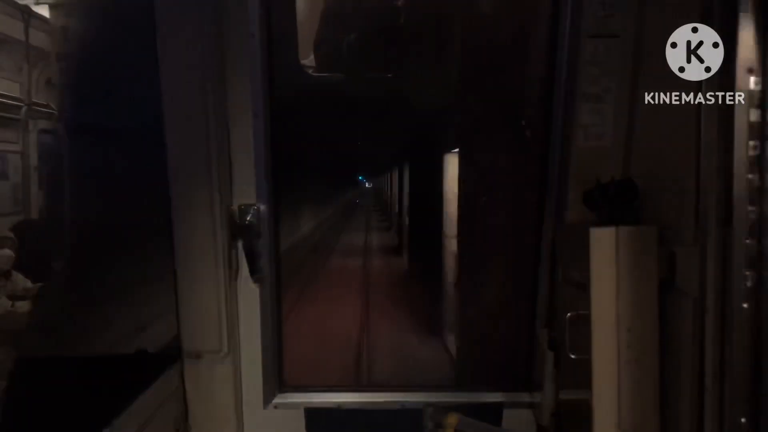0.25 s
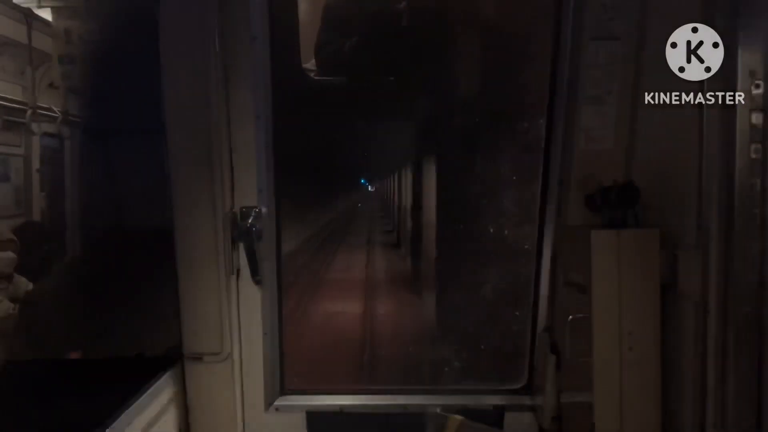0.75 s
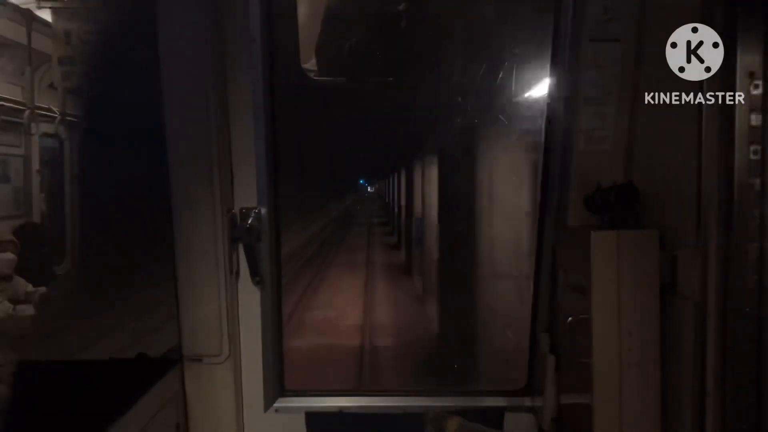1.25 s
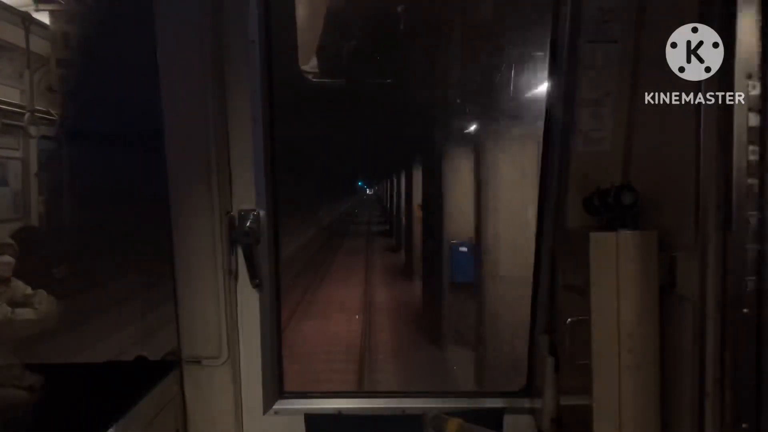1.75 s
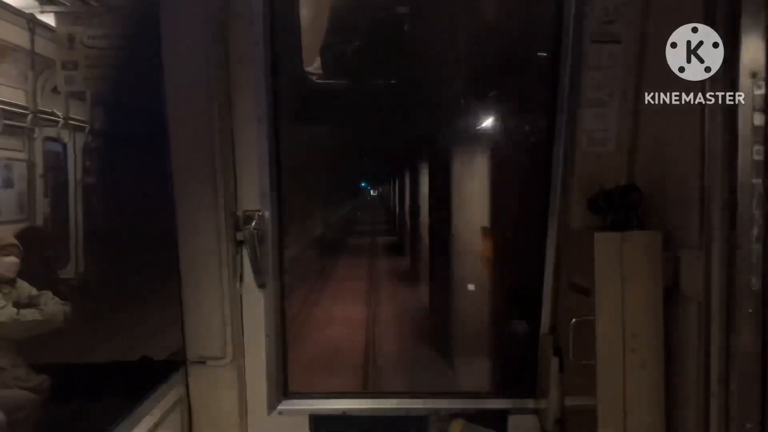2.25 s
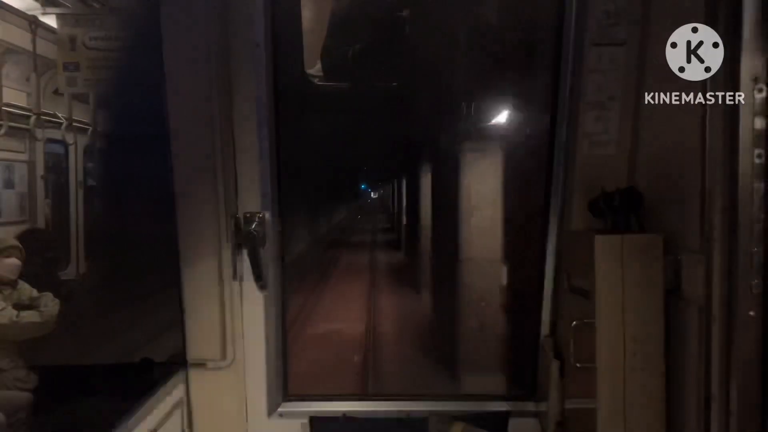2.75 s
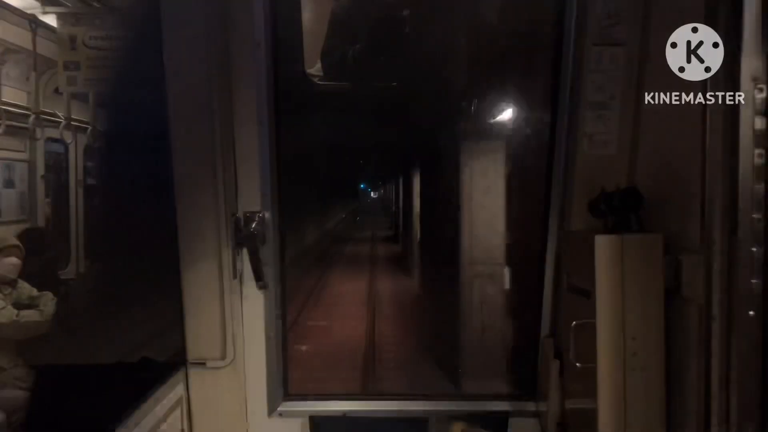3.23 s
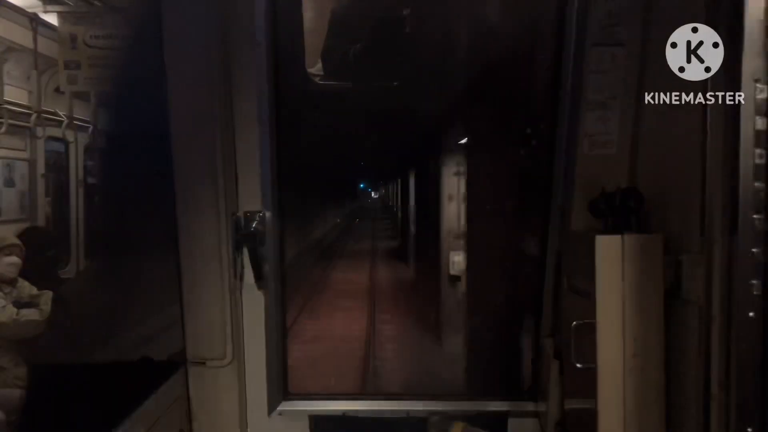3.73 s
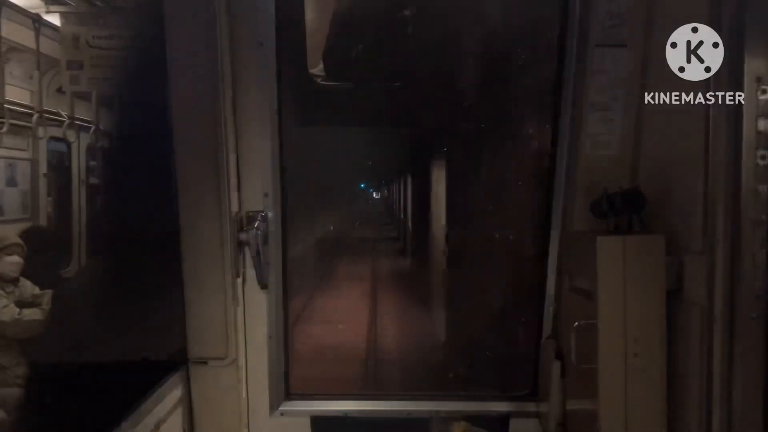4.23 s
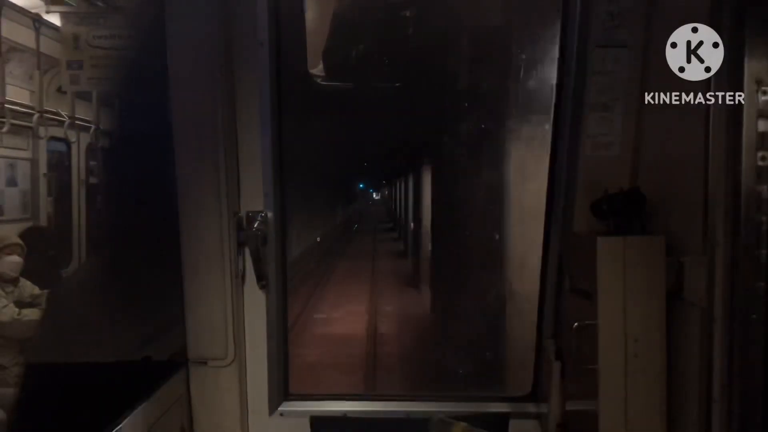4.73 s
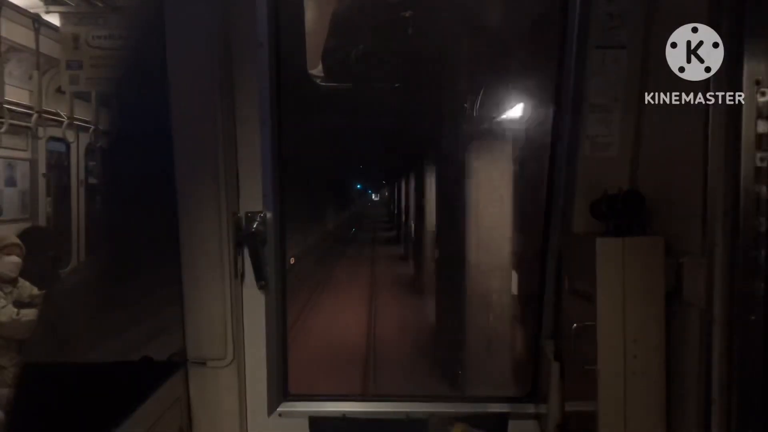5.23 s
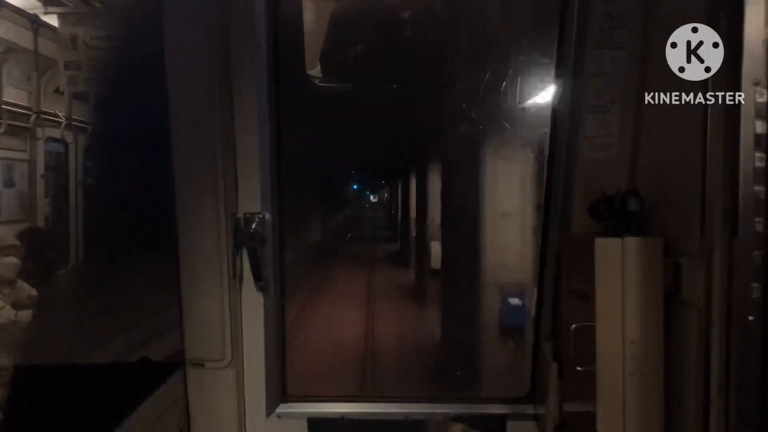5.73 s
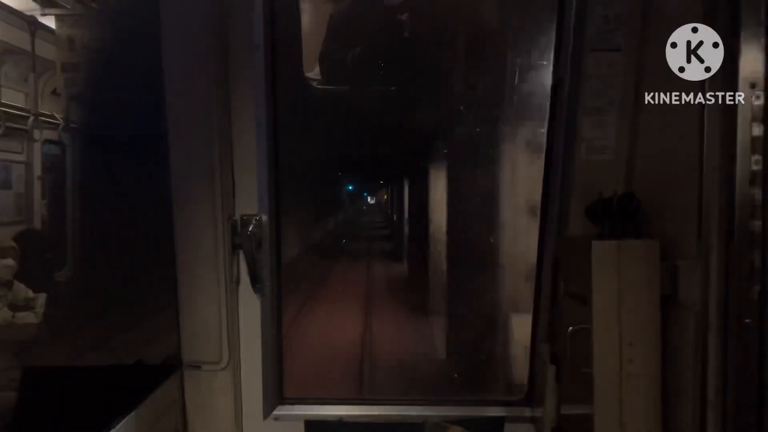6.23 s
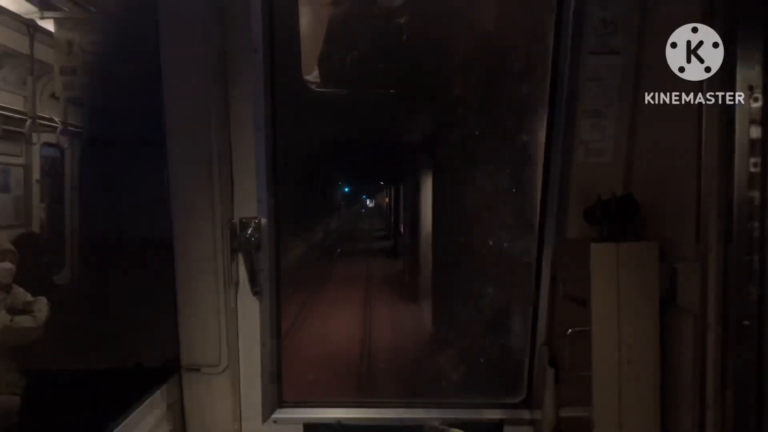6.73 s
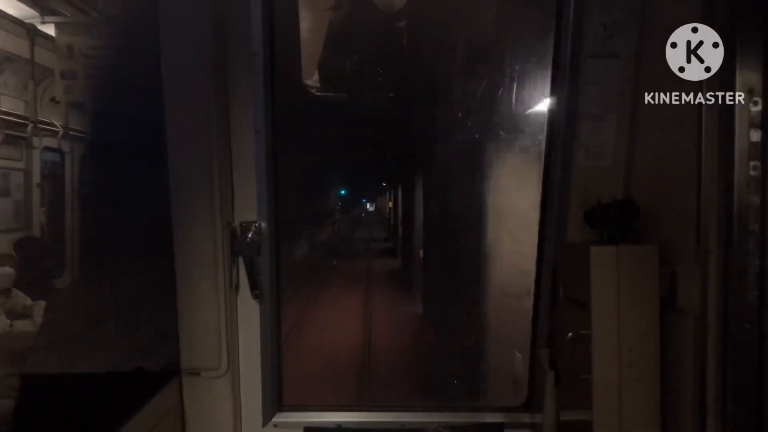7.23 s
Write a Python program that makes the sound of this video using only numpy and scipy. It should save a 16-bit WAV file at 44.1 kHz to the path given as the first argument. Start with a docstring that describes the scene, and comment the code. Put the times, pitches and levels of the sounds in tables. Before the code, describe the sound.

Continuous bass-heavy train rolling fills a small metal cab underground. Rapid, uneven thuds from a wheel ride over it, fainter around two to three seconds and firmer again later. Fittings tick and rattle, and uneven track adds soft low bumps. A faint rail tone lies underneath. After six seconds comes a quick sharp air puff with clinking metal, then tiny squeaks, while the train keeps running. Close stereo pickup, muffled on top.

```python
"""Inside the cab of an underground train running through a tunnel.
Wheels roar on the rails and boom in the car body: bands of noise and narrow hums with moving levels.
A flat spot on a wheel knocks, as short dying tones; loose fittings rattle in bursts of noise around the knocks.
Uneven track gives dull swelling tones, the rail sings a gliding tone, and a few faint squeaks are heard.
A valve lets off one burst of noisy air, and its metal parts clack and ring."""
import sys
import numpy as np
from scipy import signal
from scipy.fft import rfft, irfft
from scipy.io import wavfile
from scipy.ndimage import uniform_filter1d

SR = 44100
rng = np.random.default_rng(int(sys.argv[2]) if len(sys.argv) > 2 else 0)


def transcribe(signal):
    """Save signal, clipped to [-1, 1], as a 16-bit WAV file at the path in sys.argv[1]."""
    frames = np.atleast_2d(signal).T
    limited = np.clip(frames, -1, 1)
    pcm = np.round(limited * 32767).astype(np.int16)
    wavfile.write(sys.argv[1], SR, pcm)


N = 329868

# Slow levels of the rolling. Each row: time in seconds, floor rumble in dB, rail roar in dB, hiss in dB.
ROLLING_LEVELS = [(0, -13.5, -28, -37.5), (.15, -19.5, -30, -44.5), (.42, -19, -28.5, -45.5),
                  (.85, -17.5, -27, -39.5), (1.12, -21.5, -33.5, -47), (1.4, -20, -32.5, -49.5),
                  (1.8, -25, -34.5, -47.5), (2.1, -22.5, -28, -50.5), (2.5, -25, -32.5, -48),
                  (2.9, -21.5, -32, -47.5), (3.5, -24, -30.5, -47), (3.9, -21, -33, -48),
                  (4.3, -23.5, -30, -47), (4.55, -18, -29.5, -46), (4.85, -23, -33, -48.5),
                  (5.0, -19, -31.5, -44), (5.15, -23.5, -30.5, -48), (5.7, -22, -29.5, -44.5),
                  (6.0, -21, -32.5, -49), (6.39, -22.5, -29, -47), (6.9, -22.5, -33.5, -50),
                  (7.48, -25.5, -30.5, -46.5)]
# Boom of the car body. Each row: time in seconds, level in dB.
BOOM_LEVELS = [(0, -16.5), (.45, -20.5), (.7, -16.5), (1.0, -19), (1.35, -18), (1.7, -17.5), (2.3, -19),
               (2.7, -22), (3.4, -21), (4.2, -21.5), (5.1, -22), (5.7, -21), (6.05, -21), (6.4, -19),
               (6.9, -19.5), (7.2, -21), (7.48, -9.5)]
# Rush of air and wheel noise off the tunnel wall. Each row: time in seconds, level in dB.
RUSH_LEVELS = [(0.0, -42.5), (0.43, -46.5), (0.7, -43), (0.83, -43.5), (1.18, -48.5), (1.32, -50.5),
               (1.86, -50.5), (2.18, -48.5), (3.54, -47.5), (3.92, -49.5), (4.52, -47), (4.83, -44),
               (5.26, -48), (5.59, -46), (6.07, -46.5), (6.53, -44), (6.8, -48), (7.44, -46.5)]
# Pitches in Hz where boom, rumble, roar, rush and hiss are centred, one number each.
ROLLING_CENTRES_HZ = [62, 170, 700, 1800, 3600]
# Colour of the roar around those five levels. Each row: pitch in Hz, level in dB.
ROAR_COLOUR = [(25, -30), (40, -12), (62, -5), (90, -5.5), (170, -9), (300, -8), (500, -13.5), (750, -9.5),
               (1200, -11.5), (1600, -8.5), (2200, -3.5), (2600, -8), (3200, -9), (5000, -16.5),
               (7500, -14), (12000, -22), (15000, -34.5)]
# Narrow resonances kept sounding by the rolling.
# Each row: pitch in Hz, width in Hz, level in dB against the slow level at that pitch.
ROLLING_HUMS = [(65.17, 14.2, -4), (108, 20, -8.5), (167.6, 23, -13), (209.1, 30, -12), (472.3, 49, -18),
                (738, 160, -18.5), (2175, 190, -10.5), (2825, 120, -18), (3033, 200, -13)]
# Wheel flat striking the rail. Each row: time in seconds, strength in dB,
# floor thump in dB against that strength, upper wheel tones in dB against that strength.
KNOCKS = [(0.043, -11, 2.5, -18), (0.29, -12.5, 3.5, -15.5), (0.516, -14, 0, -13.5),
          (0.669, -24.5, 2.5, -11), (0.758, -10, 1, -17.5), (1.012, -13, 3, -11), (1.235, -14, 6, -11),
          (1.32, -21, -2.5, -9.5), (1.665, -26.5, 6.5, -16), (2.014, -27, 2, -7), (2.132, -14, -3, -10),
          (2.226, -21.5, 1, -10.5), (2.364, -23.5, -5, -4.5), (2.588, -22.5, 3, -9), (2.814, -19.5, 3, -9),
          (3.035, -17.5, 1.5, -9.5), (3.139, -18.5, -1.5, -11.5), (3.264, -28, 12, -15),
          (3.484, -14.5, 3, -10), (3.712, -22, 0, -7.5), (3.948, -11, 3, -12), (4.169, -16, 4, -8),
          (4.407, -19, 5.5, -5.5), (4.486, -24, 6.5, -6), (4.598, -12, 4, -11.5), (4.818, -12, -1, -15),
          (5.046, -15, 2.5, -14.5), (5.27, -14, 5.5, -11.5), (5.467, -19, 3.5, -8.5),
          (5.693, -15, 3.5, -8.5), (5.895, -13.5, 1.5, -13.5), (6.125, -10, 2.5, -15),
          (6.338, -10, 3.5, -12), (6.544, -14, 4, -12), (6.629, -14, -2, -12), (6.751, -15.5, 0, -11),
          (6.953, -14.5, 0.5, -10), (7.037, -20, 5, -11), (7.176, -18.5, 6.5, -11.5),
          (7.371, -18.5, -5, -8)]
# Ringing tones of wheel and bogie. Each row: pitch in Hz, level in dB, time to fade by 60 dB in seconds.
BOGIE_TONES = [(243.9, -4.5, 0.14), (302.3, -11, 0.25), (390.8, -9.5, 0.16), (470.1, -11.5, 0.22),
               (562, -17, 0.12), (636.5, -13.5, 0.076), (711, -9.5, 0.081), (766, -11, 0.096),
               (875, -11, 0.023), (954.4, -6, 0.067), (1030, -5.5, 0.041), (1140, -4, 0.067),
               (1202, -12, 0.033), (1590, -15, 0.035), (2206, -11, 0.043)]
# Ringing tones of the floor, reached through the springs.
# Each row: pitch in Hz, level in dB, time to fade by 60 dB in seconds.
FLOOR_TONES = [(106.7, -0.5, 0.26), (140, -6.5, 0.071), (167.3, -8, 0.2)]
# Loose fittings shaken into a rattle. Each row: start in seconds, strength in dB.
SHAKES = [(0.0153, -33.5), (0.2674, -33.5), (0.498, -31.5), (0.524, -36), (0.7475, -32), (.8, -42.5),
          (0.987, -34.5), (1.229, -41), (1.298, -43), (1.886, -45), (2.0223, -42), (2.1326, -37.5),
          (2.2526, -46.5), (2.359, -46.5), (3.038, -45.5), (3.133, -47), (3.4875, -39), (3.943, -37.5),
          (4.1593, -40), (4.401, -39), (4.594, -36), (4.817, -38), (5.0476, -47.5), (5.271, -39),
          (5.467, -43.5), (5.688, -45), (5.879, -38), (6.042, -43), (6.123, -38), (6.341, -39),
          (6.382, -35.5), (6.545, -42), (6.6288, -41), (6.679, -42), (6.7442, -47), (6.8488, -47),
          (6.95, -40.5), (6.9992, -40.5), (7.1676, -43.5), (7.3344, -38.5)]
# Single bright ticks of a loose fitting. Each row: start in seconds, strength in dB.
TICKS = [(.109, -33), (.589, -32), (1.096, -50), (1.135, -37), (2.161, -33), (2.255, -38), (3.365, -50),
         (4.13, -38), (4.525, -40), (4.787, -40), (5.554, -45), (5.816, -40), (5.893, -46), (6.138, -42),
         (6.244, -38), (7.362, -42), (7.373, -34)]
# Colour of rattles and ticks. Each row: pitch in Hz, level in dB.
RATTLE_COLOUR = [(1000, -13), (2000, -19), (3200, -14.5), (4800, -19), (7500, -18), (12000, -20.5),
                 (15000, -33)]
# Dull jolts from uneven track. Each row: time of the peak in seconds, pitch in Hz, peak in dB.
JOLTS = [(.085, 62.2, -5), (0.561, 106.4, -13.5), (.775, 171, -14), (0.817, 63.6, -4.5), (.915, 59.3, -7),
         (1.529, 62.2, -11.5), (1.89, 153.6, -12), (2.018, 105, -13), (2.02, 216, -13), (2.059, 207, -16),
         (2.15, 173, -19), (2.169, 222, -12), (2.18, 69, -12), (2.26, 176, -17.5), (2.36, 61.4, -15.5),
         (2.64, 81, -23.5), (2.778, 190.5, -12.5), (2.81, 148, -18), (2.864, 67.8, -14.5),
         (2.9, 164, -13.5), (2.919, 223, -13), (3.153, 151.4, -19.5), (3.16, 208, -16), (3.165, 82, -15.5),
         (3.275, 138.5, -19), (3.278, 210, -10), (3.342, 70, -19.5), (3.535, 110.5, -12),
         (3.828, 214, -13.5), (3.993, 176, -13.5), (4.162, 71, -13), (4.2, 174.4, -11.5),
         (4.44, 170.5, -16), (4.454, 100, -12), (4.608, 215, -14), (4.68, 191, -14.5), (4.7, 60, -15.5),
         (4.835, 170.3, -15), (4.985, 109, -15), (5.697, 76.3, -13), (6.371, 64.7, -10.5),
         (7.221, 62.4, -16.5)]
# The singing rail. Each row: time in seconds, pitch in Hz, level in dB.
RAIL_GLIDE = [(0, 727, -63), (1.3, 726, -42.5), (1.7, 703, -49.5), (2.3, 699, -45.5), (2.8, 696, -47),
              (3.3, 694.4, -40), (3.9, 679, -43), (4.5, 714.5, -39), (5.0, 712, -45), (5.5, 706, -46.5),
              (6.2, 724, -45.5), (7.48, 717, -68)]
# Colour of the air jet. Each row: pitch in Hz, level in dB.
JET_COLOUR = [(900, -37), (1400, -27), (2000, -18), (2500, -16), (3000, -10), (5000, -11.5), (7500, -8),
              (12000, -12), (15000, -22)]
# Metal parts that ring when the air bursts out.
# Each row: pitch in Hz, width in Hz, level in dB, time in seconds of a 60 dB fade on top of the jet's own.
WHISTLES = [(1855, 89, -12, 0.3), (3040, 77, -9, 0.3), (3680, 70, -9, 1.5), (4550, 69, -18, .4),
            (5100, 150, -8.5, 0.31), (6170, 77, -13, .4), (7460, 260, -9, 1.5)]
# Valve parts struck as it opens and shuts. Each row: start in seconds, strength in dB.
VALVE_CLACKS = [(6.383, -43), (6.393, -48), (6.4116, -33), (6.418, -37), (6.424, -38), (6.433, -41),
                (6.444, -39), (6.456, -41), (6.475, -42), (6.49, -44), (6.506, -47)]
# What those parts ring with. Each row: pitch in Hz, level in dB, time to fade by 60 dB in seconds.
VALVE_TONES = [(1875, -11, 0.089), (2250, -11, 0.088), (2970, -3.5, 0.067), (3720, -9, .15),
               (4226, -10, 0.084), (4680, -6, .08), (4950, -4, 0.056), (5340, -10, 0.071), (5750, -8, .08),
               (6169, -8, .1), (6735, -10, .1), (7350, -6.5, 0.11)]
# Faint high squeaks. Each row: start in seconds, level in dB, length in seconds.
SQUEAKS = [(6.673, -56, 0.055), (6.847, -56, 0.026), (7.002, -54, 0.037)]
# Stereo width of the cab. Each row: pitch in Hz, side minus mid in dB.
WIDTH = [(60, -25), (130, -17), (290, -5.5), (630, -3.5), (1390, 3), (2200, 0.5), (3040, -1), (4500, 0),
         (6680, -9.5), (9000, -27), (14600, -19)]
# Stereo balance of the cab. Each row: pitch in Hz, left minus right in dB.
TILT = [(60, -1.5), (180, -0.5), (540, 0.5), (1620, 1), (4880, 1.0), (14600, -1.5)]
# Colour of the microphone in its housing. Each row: pitch in Hz, level in dB.
MICROPHONE_COLOUR = [(20, -19), (40, -0.5), (2800, 0.5), (3150, 0), (3500, -3.5), (5000, 2), (5800, -3.5),
                     (7300, -2.5), (8100, -8), (9300, -8.5), (11500, -3), (13400, -6.5), (14400, -6.5),
                     (15400, -2), (16500, -12.5)]

TREBLE_CALM, CALM_ABOVE_HZ = .6, 1400   # the treble of the roar is less patchy
STEADY_BELOW_HZ, STEADINESS, STEADY_S = 130, 0.92, 0.072   # low noise is evened out over STEADY_S
# A negative lag starts the sound before the time in the knock table.
BOGIE_LAG_S, FLOOR_LAG_S = -0.001987, .026
CONTACT_S = .006   # basic spacing of the bounces, before each tone's random delay
BLOW_RISE_S = .0012   # a wheel does not strike quite at once
KNOCK_PAN_DB = -0.5   # left-right scatter
RATTLE_T60_S, RATTLE_REFERENCE_DB = 0.35, -38.5   # a shake of this strength takes this long to fade by 60 dB
RATTLE_LONGER_S_PER_DB = -0.04   # negative: faint shakes linger longer
RATTLE_HOLD_S, SHAKE_RISE_S = 0.017, 0.0015
TICK_T60_S, FIRST_TICK_DB = 0.049, -2.5   # each shake also opens with a tick, set against its strength
JOLT_RISE_CYCLES = 2.097
RAIL_STEADY = 0.8   # steady part of the tone against its wandering part
AIR_START_S, AIR_ATTACK_S, AIR_HOLD_S = 6.409, 0.006, 0.0091   # the hold is counted from the start
AIR_DB, AIR_FADE_DB_PER_S = -28, 180
SQUEAK_HZ, SQUEAK_WIDTH_HZ = 7900, 240
PORT_LAG_S, PORT_LAG_FROM_HZ = .000241, 3100   # treble from one side reaches the left port late
PEAK, CUTOFF_HZ = .95, 16200


def from_db(db):
    """Gain of a level in dB."""
    return 10 ** (np.asarray(db) / 20)


def rms_one(x):
    """Scales to an rms (average strength) of 1."""
    return x / np.sqrt(np.mean(x ** 2) + 1e-20)


def in_time(rows):
    """Turns the columns of a table into curves over all samples."""
    s, *columns = np.transpose(rows)
    return np.array([np.interp(np.arange(N) / SR, s, c) for c in columns])


def at_hz(points, hz):
    """Reads a colour table at a pitch, on a log-frequency axis."""
    table = np.array(points)
    return np.interp(np.log(hz), np.log(table[:, 0]), table[:, 1])


def drift(rate_hz):
    """Slow chance: noise at every 40th sample, smoothed twice by a one-pole low-pass; spread 1."""
    r = np.exp(-80 * np.pi * rate_hz / SR)
    noise = rng.standard_normal(N // 40 + 2002)
    slow = signal.lfilter([1], [1, -2 * r, r * r], noise)[2000:]   # drop the filter's start
    return np.interp(np.arange(N) / 40, np.arange(len(slow)), rms_one(slow))


def stereo(mid, side, hz):
    """Left and right from a mid and a side signal, as wide and tilted as the cab sounds at this pitch."""
    opposed = np.array([[1], [-1]])
    spread = mid + from_db(at_hz(WIDTH, hz)) * side * opposed
    return spread * from_db(at_hz(TILT, hz) / 2 * opposed)


def steadied(x, hz):
    """Low noise below 130 Hz is evened out, so that the level curves carry its swells."""
    if hz > STEADY_BELOW_HZ:
        return x
    strength = uniform_filter1d(x[0] ** 2, round(STEADY_S * SR)) + 0.041
    return rms_one(x / strength ** (STEADINESS / 2))


def hum(hz, width):
    """One resonance driven by noise: mid and side noise pass it twice, then are set to rms 1 together."""
    r = np.exp(-np.pi * width / SR)
    section = [1, 0, -1, 1, -2 * r * np.cos(2 * np.pi * hz / SR), r * r]
    ringing = signal.sosfilt([section, section], rng.standard_normal((2, N)))
    return stereo(*steadied(rms_one(ringing), hz), hz)


def rolling_levels():
    """Slow levels of boom, rumble, roar, rush and hiss, in order of pitch."""
    rumble, roar, hiss = in_time(ROLLING_LEVELS)
    return np.vstack([in_time(BOOM_LEVELS), rumble, roar, in_time(RUSH_LEVELS), hiss])


def rolling_db(rolling, hz):
    """Level of the rolling at one pitch: a blend of the two nearest level curves."""
    place = np.interp(np.log(hz), np.log(ROLLING_CENTRES_HZ), np.arange(len(rolling)))
    k = min(int(place), len(rolling) - 2)
    return rolling[k] + (place - k) * (rolling[k + 1] - rolling[k])


def rattle_gain(grit_db):
    """Each shake starts with a tick, holds and dies away; uneven contacts roughen it."""
    gain = np.zeros(N)
    events = []
    for s, db in SHAKES:
        t60 = RATTLE_T60_S + RATTLE_LONGER_S_PER_DB * (db - RATTLE_REFERENCE_DB)
        events.append((s, db, max(t60, .05), RATTLE_HOLD_S))
        events.append((s, db + FIRST_TICK_DB, TICK_T60_S, 0))
    events += [(s, db, TICK_T60_S, 0) for s, db in TICKS]
    for s, start_db, t60, hold in events:
        i = round(s * SR)
        t = np.arange(min(SR // 2, N - i)) / SR
        fade = from_db(start_db - 60 * np.maximum(t - hold, 0) / t60)
        gain[i:i + len(t)] += fade * np.minimum(t / SHAKE_RISE_S, 1)
    return gain * from_db(grit_db * drift(180))


def roar_rattles_and_jet(rolling, air_db, patchy_db, shared_db):
    """Roar, rattles and air jet are all noise: their powers add in each third-octave band."""
    out = 0
    edges = 22 * 2 ** np.arange(0, 9.7, 1 / 3)   # Hz
    white = rng.standard_normal((2, 2, N))       # neighbouring bands get unrelated noise
    together = drift(35)
    shaken_power = rattle_gain(grit_db=1.5) ** 2
    jet_power = from_db(air_db + 1.2 * drift(140)) ** 2
    for k, (low, high) in enumerate(zip(edges, edges[1:])):
        hz = np.sqrt(low * high)
        band_pass = signal.butter(2, [low, high], "band", fs=SR, output="sos")
        band = rms_one(signal.sosfilt(band_pass, white[k % 2]))
        calm = TREBLE_CALM if hz > CALM_ABOVE_HZ else 1
        flicker_db = patchy_db * calm * drift(9.6) + shared_db * together
        roar = from_db(at_hz(ROAR_COLOUR, hz) + rolling_db(rolling, hz) + flicker_db)
        rattle = shaken_power * from_db(at_hz(RATTLE_COLOUR, hz)) ** 2
        jet = jet_power * from_db(at_hz(JET_COLOUR, hz)) ** 2
        out = out + np.sqrt(roar ** 2 + rattle + jet) * stereo(*steadied(band, hz), hz)
    return out


def rolling_hums(rolling):
    """Narrow resonances kept sounding by the rolling; each follows its level and wavers slowly."""
    out = 0
    for hz, width, db in ROLLING_HUMS:
        level_db = db + rolling_db(rolling, hz) + 1.85 * drift(3)
        out = out + from_db(level_db) * hum(hz, width)
    return out


def strike(tones, strengths_db, pan_db, lag_s, spread_db, bounce_db, detune):
    """Every knock is a contact and two bounces; strength and pitch of each tone differ from knock to knock."""
    s = np.array(KNOCKS)[:, 0]
    hz, level_db, t60 = np.transpose(tones)
    t, out = np.arange(SR // 5) / SR, np.zeros((2, N + SR))
    luck = rng.standard_normal((len(s), 4, len(tones), 3))   # strength, side share, pitch, delay
    for k, (strength, side, pitch, delay) in enumerate(luck):
        for bounce in range(3):
            size = from_db(strengths_db[k] + level_db + spread_db * strength[:, 0] + bounce_db * bounce)
            late = t - CONTACT_S * (bounce + abs(delay[:, bounce, None]) / 4)
            cycles = (hz * (1 + detune * pitch[:, 0]))[:, None] * late
            envelope = np.clip(late / BLOW_RISE_S, 0, 1) * from_db(-60 * late / t60[:, None])
            rings = envelope * np.sin(2 * np.pi * cycles)
            pair = stereo(size, size * side[:, bounce], hz) @ rings   # adds up all tones
            i = round((s[k] + lag_s) * SR)
            out[:, i:i + len(t)] += pair * from_db(pan_db[k] / 2 * np.array([[1], [-1]]))
    return out[:, :N]


def wheel_flat():
    """The bogie rings at once, the floor thumps just after; rubber mounts soften the edge."""
    s, strength_db, thump_db, bright_db = np.transpose(KNOCKS)
    pan_db = KNOCK_PAN_DB * rng.standard_normal(len(s))
    # The upper-tone level sets in gradually above 750 Hz.
    octaves = np.maximum(np.log2(np.array(BOGIE_TONES)[:, 0] / 750), 0)
    bogie_db = strength_db[:, None] + bright_db[:, None] * np.minimum(octaves / 0.43, 1)
    bogie = strike(BOGIE_TONES, bogie_db, pan_db, BOGIE_LAG_S, spread_db=0.98, bounce_db=-6.0, detune=0.021)
    floor_db = strength_db + thump_db
    floor = strike(FLOOR_TONES, floor_db, pan_db, FLOOR_LAG_S, spread_db=2.0, bounce_db=-5.0, detune=0.036)
    return signal.sosfilt(signal.butter(2, 2500, fs=SR, output="sos"), bogie + floor)


def track_jolts():
    """Uneven track jolts the car: each jolt is a low tone that swells over a few cycles and dies away."""
    out, t = np.zeros((2, N + SR)), np.arange(SR // 4) / SR
    chance = rng.uniform(-0.99, 1, (len(JOLTS), 2))   # phase, side share
    for (s, hz, db), (phase, side) in zip(JOLTS, chance):
        rise = t * hz / JOLT_RISE_CYCLES   # reaches 1 at the peak
        i = round((s - JOLT_RISE_CYCLES / hz) * SR)
        wave = from_db(db) * rise * np.exp(1 - rise) * np.sin(2 * np.pi * hz * t + np.pi * phase)
        out[:, i:i + len(t)] += stereo(wave, side * wave, hz)
    return out[:, :N]


def singing_rail(waver_hz):
    """A gliding tone whose strength and phase wander, as in a noise-driven resonance."""
    hz, level_db = in_time(RAIL_GLIDE)
    phase = 2 * np.pi * np.cumsum(hz) / SR

    def wandering(steady):
        return (steady + drift(waver_hz)) * np.cos(phase) + drift(waver_hz) * np.sin(phase)

    mid, side = wandering(RAIL_STEADY), wandering(0)
    return from_db(level_db) * stereo(mid, side, hz.mean())


def air_level():
    """The valve opens quickly, blows briefly, and the pressure runs down."""
    since = np.arange(N) / SR - AIR_START_S
    fade_db = AIR_FADE_DB_PER_S * np.maximum(since - AIR_HOLD_S, 0)
    attack_db = 20 * np.log10(np.clip(since / AIR_ATTACK_S, 1e-6, 1))
    return AIR_DB - fade_db + attack_db


def valve_whistles(air_db):
    """Resonances under the jet follow its level, each with a further fade of its own."""
    since = np.maximum(np.arange(N) / SR - AIR_START_S, 0)
    return sum(from_db(air_db + db - 60 * since / t60) * hum(hz, width) for hz, width, db, t60 in WHISTLES)


def valve_clacks(spread_db, detune):
    """Each clack strikes every tone with a strength and a slight pitch shift of its own."""
    hz, level_db, t60 = np.transpose(VALVE_TONES)
    t, out = np.arange(SR // 4) / SR, np.zeros((2, N + SR))
    fades = from_db(-60 * t / t60[:, None])
    luck = rng.standard_normal((len(VALVE_CLACKS), 3, len(hz)))
    for (s, db), (strength, side, pitch) in zip(VALVE_CLACKS, luck):
        rings = fades * np.sin(2 * np.pi * (hz * (1 + detune * pitch))[:, None] * t)
        size = from_db(db + level_db + spread_db * strength)
        i = round(s * SR)
        out[:, i:i + len(t)] += stereo(size, size * side, hz) @ rings
    return out[:, :N]


def squeaks():
    """Short swells of one high resonance driven by noise."""
    t = np.arange(N) / SR
    swells = sum(from_db(db) * np.sin(np.pi * np.clip((t - s) / length, 0, 1)) for s, db, length in SQUEAKS)
    return swells * hum(SQUEAK_HZ, SQUEAK_WIDTH_HZ)


def scene():
    """All that sounds in the cab."""
    rolling, air_db = rolling_levels(), air_level()
    running = roar_rattles_and_jet(rolling, air_db, patchy_db=2.0, shared_db=0.64) + rolling_hums(rolling)
    bumps = wheel_flat() + track_jolts()
    valve = valve_whistles(air_db) + valve_clacks(spread_db=2.0, detune=.012)
    return running + bumps + singing_rail(waver_hz=13) + valve + squeaks()


def record(dry):
    """The microphone colours the sound, its ports hear treble apart in time, peaks round, the top is cut."""
    hz = np.maximum(np.arange(N // 2 + 1) * SR / N, 1)
    # Half the lag goes to each side: left later, right earlier.
    turn = np.pi * PORT_LAG_S * np.maximum(hz - PORT_LAG_FROM_HZ, 0) * [[-1], [1]]
    heard = irfft(rfft(dry) * from_db(at_hz(MICROPHONE_COLOUR, hz)) * np.exp(1j * turn), N)
    rounded = PEAK * np.tanh(heard / PEAK)
    return signal.sosfilt(signal.cheby2(12, 70, CUTOFF_HZ, fs=SR, output="sos"), rounded)


dry = scene()
out = record(dry)
transcribe(out)
```